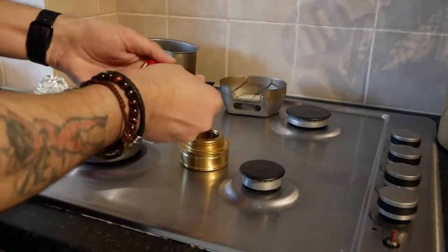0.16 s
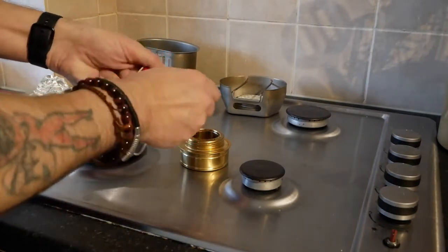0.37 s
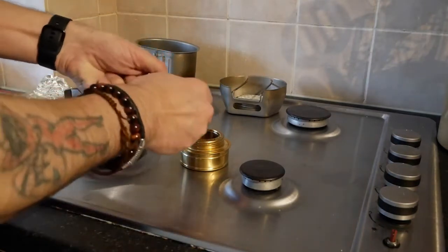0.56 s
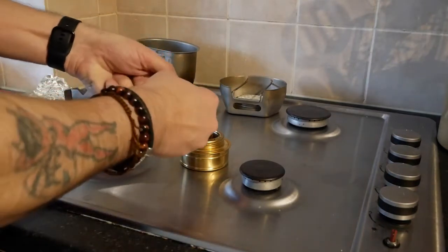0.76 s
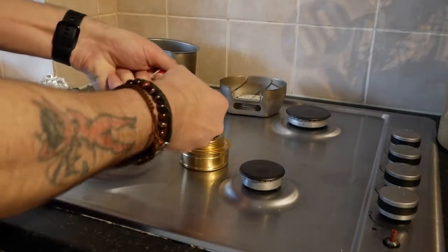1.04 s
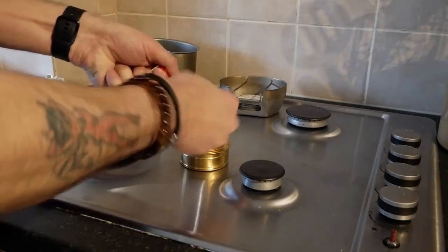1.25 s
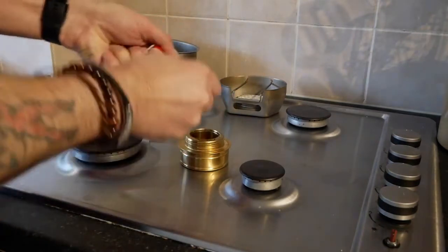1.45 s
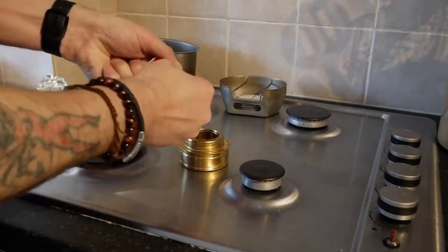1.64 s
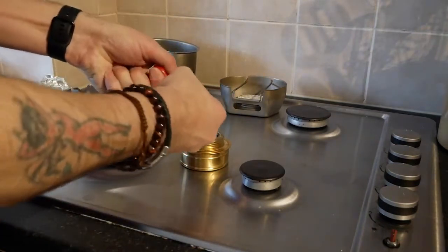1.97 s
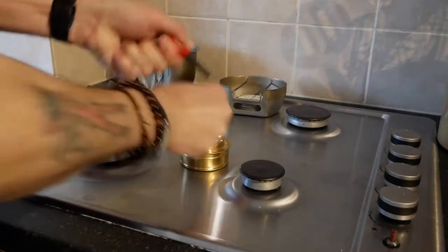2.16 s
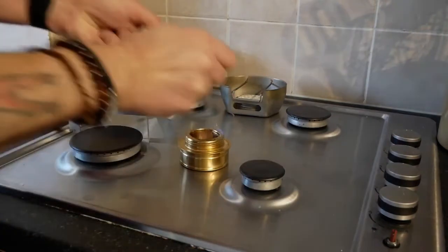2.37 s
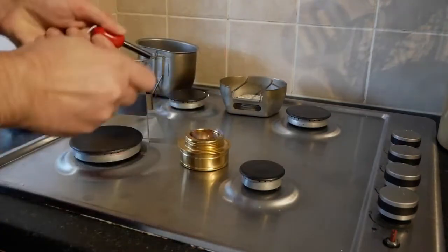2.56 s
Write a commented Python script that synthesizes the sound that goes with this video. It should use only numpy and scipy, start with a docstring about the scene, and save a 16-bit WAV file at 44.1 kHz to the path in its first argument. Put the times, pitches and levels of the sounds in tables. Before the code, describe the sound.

Fire steel struck in a kitchen: small metallic clicks, then two sharp scrapes with sputtering sparks

```python
"""A steel striker is set on a ferro rod and scraped down it over a small burner on a kitchen hob.
A light drag and two hard strokes rasp as random grains and ring the tool's modes; contacts crack and clack.
The first hard stroke throws a few sparks and the last a shower: coloured grains fizz and sputter, clicks snap.
The tiled room answers with decaying noise, over low rumble, hum and rustling hands, almost in mono."""
import sys
import numpy as np
from scipy import signal
from scipy.fft import rfft, irfft
from scipy.io import wavfile

SR = 44100
rng = np.random.default_rng(int(sys.argv[2]) if len(sys.argv) > 2 else 0)


def dump_mix(stems):
    """Bounce the given channels to the path in sys.argv[1] as a 16-bit WAV at rate SR."""
    frames = np.atleast_2d(stems).T  # one column per channel
    limited = np.clip(frames, -1, 1)  # hard clip at full scale
    pcm = np.round(limited * 32767).astype(np.int16)
    wavfile.write(sys.argv[1], SR, pcm)


N = 119070  # samples, 2.7 s
T = np.arange(N) / SR  # s

# short ring of striker and rod, relative to the touch: [f/Hz, level/dB, t60/s]
TOOL_MODES = [(2420, -11, .012), (2640, -12, .010), (2860, -10, .012), (3700, -23, .012), (5850, -28, .011),
              (6280, -26, .012), (7450, -31, .007)]


def from_db(db):
    """Decibels to amplitude gain."""
    return 10 ** (np.asarray(db) / 20)


def rms_one(x):
    """Scale to unit rms."""
    return x / np.sqrt(np.mean(x ** 2) + 1e-20)


def at_hz(points, hz, axis=1):
    """Read a column of a table on a log-frequency axis."""
    points = np.array(points)
    return np.interp(np.log(hz + 1e-9), np.log(points[:, 0]), points[:, axis])


def shaped(x, spectrum):
    """Filter by a table of [f/Hz, level/dB]."""
    hz = np.arange(N // 2 + 1) * SR / N
    return irfft(rfft(x) * from_db(at_hz(spectrum, hz)), N)


def colour(x, spectrum):
    """Give a steady sound a spectrum; rms 1."""
    return rms_one(shaped(x, spectrum))


def filtered(x, order, hz, kind):
    """Butterworth filter; the tiny offset keeps silence from slowing it."""
    return signal.sosfilt(signal.butter(order, hz, kind, fs=SR, output="sos"), x + 1e-18)


def dull(x, hz):
    """A softer contact loses its top."""
    return filtered(x, 3, min(hz, .45 * SR), "low")


def grains(per_s, spread_db):
    """Random tiny impulses of uneven size and either sign; rms 1."""
    sizes = from_db(spread_db * np.minimum(rng.exponential(1, N), 4))
    signs = rng.choice([-1, 1], N)
    return rms_one(sizes * signs * (rng.random(N) < per_s / SR))


def clicks(times, levels_db):
    """One impulse for each event."""
    return np.bincount((np.array(times) * SR).astype(int), from_db(levels_db), N)[:N]


def ring(x, modes):
    """Each click sets damped sine modes [f/Hz, level/dB, t60/s] ringing."""
    out = 0
    for hz, db, t60 in modes:
        radius = from_db(-60 / (t60 * SR))
        angle = 2 * np.pi * hz / SR
        strike = [0, from_db(db) * np.sin(angle)]
        out = out + signal.lfilter(strike, [1, -2 * radius * np.cos(angle), radius ** 2], x + 1e-18)
    return out


def envelope(start, end, rise_s, decay_s):
    """Straight rise from start, times an exponential decay that begins at end."""
    return np.clip((T - start) / rise_s, 0, 1) * np.exp(-np.clip((T - end) / decay_s, 0, 20))


def background():
    """Room rumble and hiss, a wavering narrow-band hum and the soft low draught of the moving hands."""
    # spectrum of the quiet room: [f/Hz, level/dB per Hz]
    floor_spectrum = [(20, -13.5), (42, -6), (60, 1.5), (85, -3), (115, -11.5), (155, -7.5), (212, -2),
                      (300, -14), (550, -18.5), (1000, -23), (2000, -29), (4000, -33.5), (8000, -38.5),
                      (15000, -41.5)]
    # hum bands: [f/Hz, width/Hz, level/dB]
    hum_bands = [(64.1, 6.2, -58), (85.3, 6.2, -55.5), (217.8, 34.6, -60)]
    # air pushed by the hands in a hard stroke: [start t/s, end t/s, level/dB]
    draughts = [(1.198, 1.3, -39.5), (2.09, 2.22, -66)]
    draught_hz, draught_edge_s = 34, 0.066
    out = from_db(-52) * colour(rng.standard_normal(N), floor_spectrum)
    for hz, width_hz, db in hum_bands:
        edges_hz = [hz - width_hz / 2, hz + width_hz / 2]
        # a second of run-in lets the narrow filter settle
        hum = filtered(rng.standard_normal(N + SR), 2, edges_hz, "band")[SR:]
        out += from_db(db) * rms_one(hum)
    push = sum(from_db(db) * envelope(start, end, draught_edge_s, draught_edge_s)
               for start, end, db in draughts)
    return out + push * rms_one(dull(rng.standard_normal(N), draught_hz))


def kitchen(x):
    """Dense reflections off tiles and steel: bands of noise, each dying at its own rate."""
    # reverberation: [f/Hz, t60/s, level/dB]
    reverberation = [(199, 0.25, 4), (1000, 0.53, -11.5), (2540, 0.47, -6.5), (3600, 0.56, -6),
                     (5500, 0.39, -1.5), (9400, 0.51, -14), (15000, .3, -7.5)]
    onset_s = 0.0013  # silent this long, then rising over the same time again
    t, edges, response = T[:SR], np.geomspace(120, 18000, 13), 0
    white = rng.standard_normal((2, SR))
    for k, band in enumerate(zip(edges, edges[1:])):
        hz = np.sqrt(band[0] * band[1])
        tail = from_db(-60 * t / at_hz(reverberation, hz))
        tail = tail * np.clip(t / onset_s - 1, 0, 1)
        noise = filtered(white[k % 2], 2, band, "band")  # neighbouring bands differ
        level = from_db(at_hz(reverberation, hz, axis=2))
        response = response + noise * tail / np.linalg.norm(tail) * level
    return signal.fftconvolve(x, response)[:N]


def rustle():
    """Skin and bracelets rub as the hands move: sparse coloured grains."""
    # movements of the hands: [start t/s, end t/s, level/dB]
    movements = [(0.294, 0.323, -66), (2.41, 2.686, -59)]
    # colour of the rubbing: [f/Hz, level/dB per Hz]
    rub_spectrum = [(300, -8), (800, -2), (1500, -2), (3200, -3), (6000, -15.5), (15000, -23)]
    edge_s = 0.0053
    moving = sum(from_db(db) * envelope(start, end, edge_s, edge_s) for start, end, db in movements)
    return moving * colour(grains(per_s=2500, spread_db=1.5), rub_spectrum)


def sparks():
    """Shavings burn with a fine fizz and a coarse sputter; single ones flare, puff or snap."""
    # showers of burning sparks: [start t/s, end t/s, fizz level/dB, sputter level/dB]
    showers = [(1.246, 1.283, -51, -51), (2.121, 2.144, -31.5, -35.5), (2.165, 2.276, -66, -45.5)]
    # single sparks flaring with a hiss: [t/s, level/dB, decay/s]
    flares = [(0.43, -45, 0.006), (1.278, -30.5, 0.0037), (1.431, -35, 0.013), (1.4753, -40, 0.0046),
              (2.139, -19, 0.0033), (2.183, -26.5, 0.0067), (2.2103, -28.5, 0.036), (2.238, -36, 0.0051),
              (2.2665, -36, .007), (2.326, -43.5, 0.011), (2.4641, -41.5, 0.011), (2.4994, -42, 0.02),
              (2.611, -56, 0.0072), (2.6754, -59.5, 0.024)]
    # sparks bursting with a dull puff: [t/s, level/dB]
    puffs = [(1.2451, -29.5), (2.139, -22), (2.1832, -23.5), (2.2013, -26.5), (2.211, -25.5), (2.225, -30),
             (2.2338, -32), (2.238, -29), (2.247, -28), (2.397, -43.5)]
    # sparks snapping apart, relative levels: [t/s, level/dB]
    snap_events = [(1.2989, -17), (1.4317, -16), (1.4765, -19), (1.4811, -21), (2.1576, -17), (2.17, -9),
                   (2.2622, -23), (2.2685, -9.5), (2.2715, -13), (2.275, -18), (2.3024, -30),
                   (2.3364, -19.5), (2.5014, -19), (2.5054, -20)]
    # colours of burning metal, fine and coarse: [f/Hz, level/dB per Hz]
    fizz_spectrum = [(500, -12), (2000, -11), (3700, 0), (5200, -9), (7000, -4.5), (8800, -2), (11000, -6),
                     (13000, -8.5), (16000, -20)]
    sputter_spectrum = [(30, 12.5), (130, -17), (300, -5), (450, -2.5), (575, 1.5), (850, 0.5), (1030, 2),
                        (1250, -10), (1600, 2), (2600, -11), (3700, -16), (5500, -22), (12000, -46)]
    rise_s, puff_decay_s = 0.0025, 0.0062
    fizz = sum(from_db(db) * envelope(s, s, rise_s, decay_s) for s, db, decay_s in flares)
    sputter = sum(from_db(db) * envelope(s, s + rise_s, rise_s, puff_decay_s) for s, db in puffs)
    for start, end, fizz_db, sputter_db in showers:
        burning = envelope(start, end, rise_s=.004, decay_s=.032)
        fizz = np.hypot(fizz, from_db(fizz_db) * burning)  # powers add
        sputter = np.hypot(sputter, from_db(sputter_db) * burning)
    snaps = ring(clicks(*np.transpose(snap_events)), [(10100, 0, .0007)])  # f/Hz, level/dB, t60/s
    snaps = from_db(2.5) * filtered(snaps, 3, 6200, "high")
    fine = colour(grains(per_s=20000, spread_db=-0.6), fizz_spectrum)
    coarse = colour(grains(per_s=7000, spread_db=1.5), sputter_spectrum)
    return fizz * fine + sputter * coarse + snaps


def knocks():
    """Each contact is a brief crack, a short ring of the tool and a faint ring of the steel; no bass."""
    # contacts on the rod: [t/s, tool ring level/dB, crack level/dB, steel ring level/dB, crack top f/Hz]
    contacts = [(.4872, -22, -30.5, -40, 6000), (.517, -36, -50, -62, 5000), (.5845, -32, -43, -51, 7100),
                (.6443, -24, -33, -52, 7000), (0.6666, -17, -29.5, -42, 6000), (.6712, -21, -51, -54, 5500),
                (.6735, -25.5, -50, -53, 5500), (.7025, -41, -66, -65, 5000),
                (1.2434, -9.5, -22.5, -25, 14000), (1.3404, -11, -11, -15, 10500),
                (1.343, -25, -19.5, -30, 9000), (1.3459, -18, -59, -30, 10500),
                (1.6129, -16.5, -20.5, -34, 12000), (2.1176, -3.5, -16.5, -35, 12000)]
    # faint lasting ring of the steel, relative to the contact: [f/Hz, level/dB, t60/s]
    steel_modes = [(2445, -36, .24), (2585, -38, .14), (2925, -33, .15), (3273, -40, .25), (3634, -41, .3),
                   (4115, -32, .15), (4328, -43, .4), (4915, -36, .28), (5075, -33, .15), (5706, -33, .16),
                   (6062, -41, .25)]
    # colour of the crack: [f/Hz, level/dB per Hz]
    crack_spectrum = [(200, -25), (800, -15), (1300, -11), (2100, -7), (2900, -6), (4200, -4), (7000, -3),
                      (8800, -8), (10200, -5), (13000, -16), (16000, -3)]
    crack_decay_s, tail_decay_s, tail_db = 0.0024, 0.021, -17.5
    rebound_s, rebound_db = 0.00078, -4.5  # the striker touches again just after each knock
    times, ring_db, _, steel_db, _ = np.transpose(contacts)
    noise = colour(rng.choice([-1., 1.], N), crack_spectrum)
    touches = clicks(times, ring_db) + clicks(times + rebound_s, ring_db + rebound_db)
    out = ring(touches, TOOL_MODES) + ring(clicks(times, steel_db), steel_modes)
    for s, _, crack_db, _, top_hz in contacts:
        crack = envelope(s, s, 1 / SR, crack_decay_s)
        tail = from_db(tail_db) * envelope(s, s, 1 / SR, tail_decay_s)
        out += dull(from_db(crack_db) * (crack + tail) * noise, top_hz)
    return filtered(out, 2, 1700, "high")  # small parts give no bass


def strokes():
    """The edge tears grains off the rod, unevenly and harder as it gathers speed, and keeps the tool ringing."""
    # strokes: [start t/s, end t/s, rasp level at the end/dB, ring level/dB, swell/dB, rasp top f/Hz]
    scrapes = [(.612, 0.673, -49, -42, 15, 9400), (1.205, 1.245, -26.5, -39, 8, 15000),
               (2.083, 2.117, -23.5, -35.5, 17, 14500)]
    # colour of the rasp: [f/Hz, level/dB per Hz]
    rasp_spectrum = [(200, -10.5), (1000, -32), (3000, 4), (4500, -5), (6200, 7), (7300, 5.5), (9500, 4.5),
                     (12000, 0.5), (16000, -6.5)]
    chatter_hz, chatter_db, edge_s = 348, 0.1, 0.0022
    # the edge catches and slips
    bite = from_db(chatter_db * rms_one(dull(rng.standard_normal(N), chatter_hz)))
    tearing = bite * grains(per_s=15000, spread_db=1)
    rasp = colour(tearing, rasp_spectrum)
    ringing = rms_one(ring(tearing, TOOL_MODES))
    out = 0
    for start, end, rasp_db, ring_db, swell_db, top_hz in scrapes:
        contact = envelope(start, end, edge_s, edge_s)
        to_go = np.clip((end - T) / (end - start), 0, 1)
        rasping = from_db(rasp_db - swell_db * to_go ** 2) * dull(rasp, top_hz)
        out = out + contact * (rasping + from_db(ring_db) * ringing)
    return out


def scene():
    """Tool, sparks, hands, room and hum; a short noise smear, tilted to treble, gives a little stereo width."""
    # side against middle: [f/Hz, level/dB]
    width = [(100, -53), (400, -29), (1200, -29), (2600, -36.5), (6000, -25), (9000, -22), (14000, -21)]
    tool, burning = knocks() + strokes(), sparks()
    room = kitchen(tool + from_db(-1.5) * burning)
    mid = tool + burning + room + rustle() + background()
    smear = rng.standard_normal(N) * envelope(0, 0, 1 / SR, decay_s=0.0017)
    smeared = signal.fftconvolve(mid, smear / np.linalg.norm(smear))[:N]
    side = shaped(smeared, width)
    return np.array([mid + side, mid - side])


def record(dry):
    """A steep elliptic low-pass cuts the top above 15.8 kHz."""
    return signal.sosfilt(signal.ellip(10, .1, 80, 15800, fs=SR, output="sos"), dry)


dry = scene()
out = record(dry)
dump_mix(out)
```